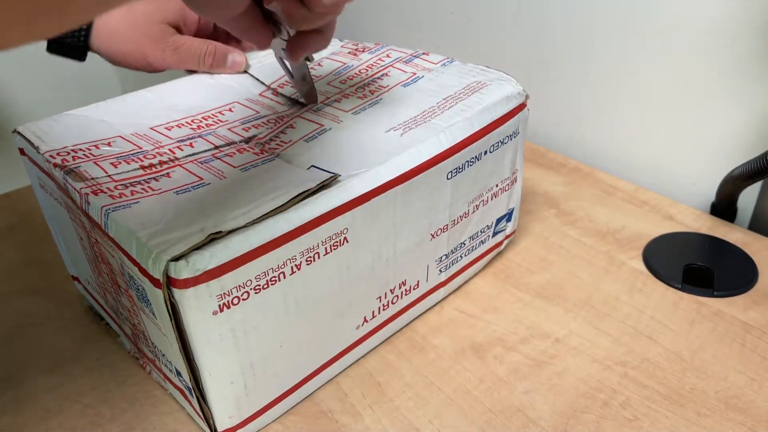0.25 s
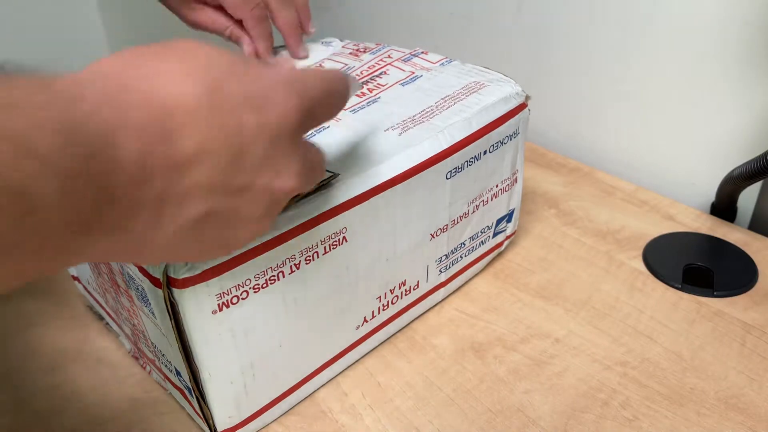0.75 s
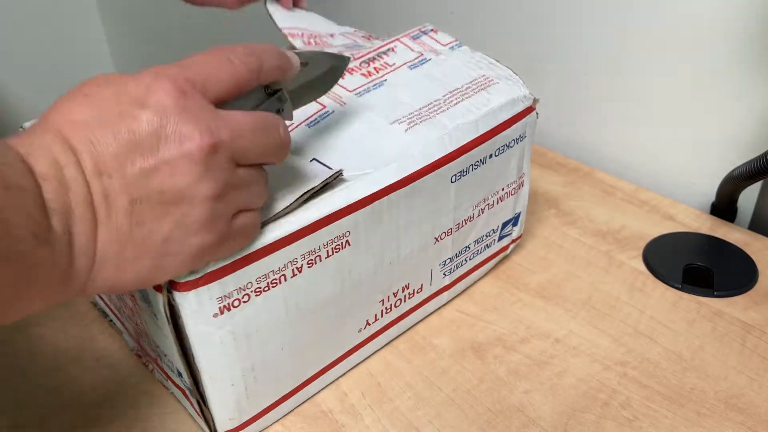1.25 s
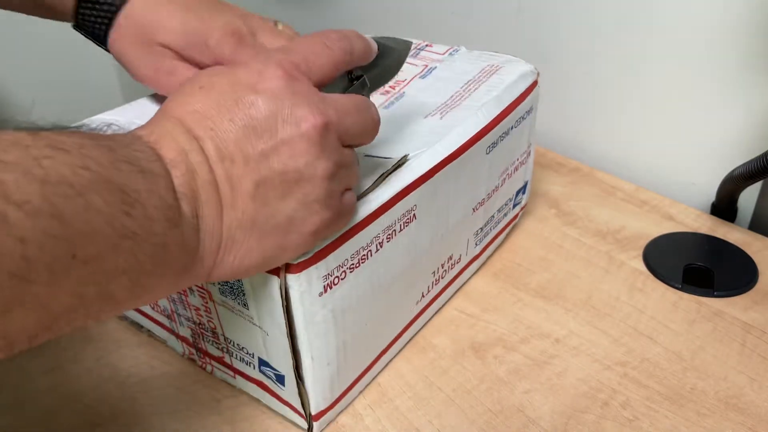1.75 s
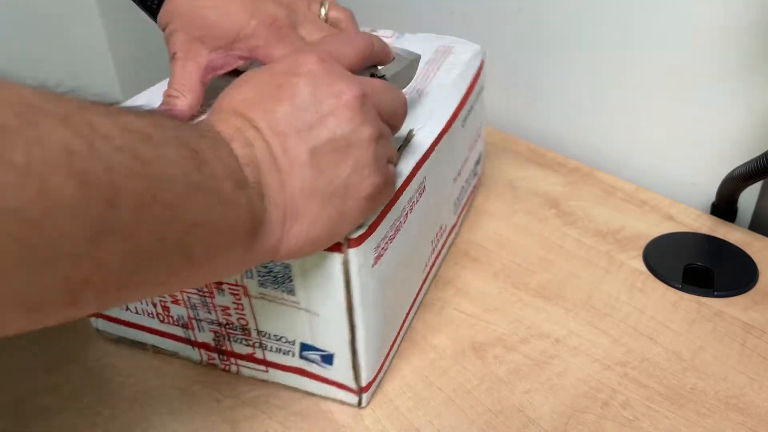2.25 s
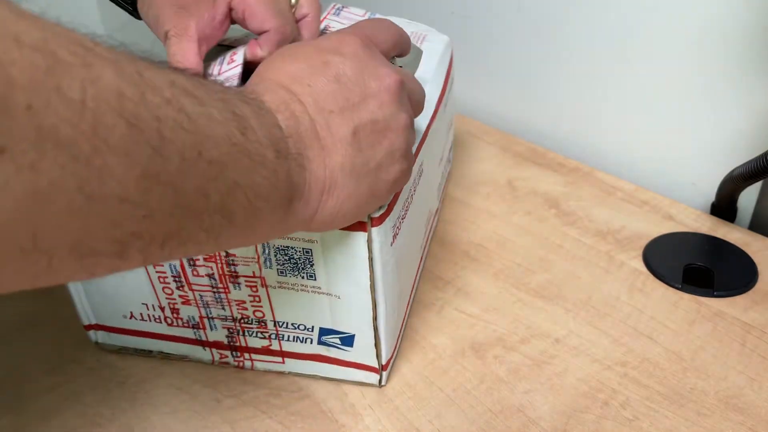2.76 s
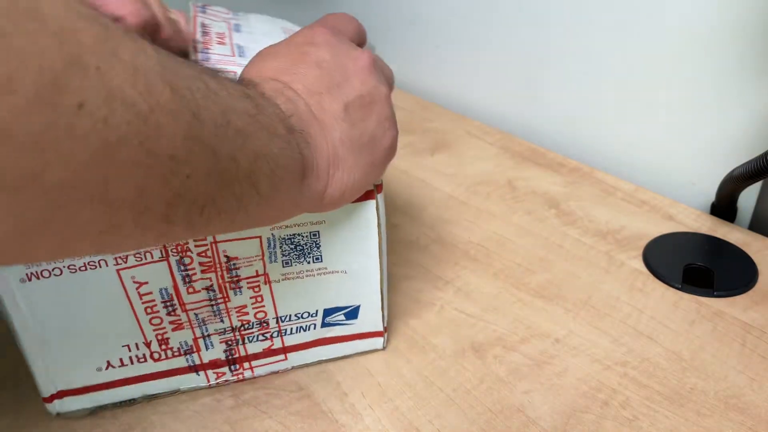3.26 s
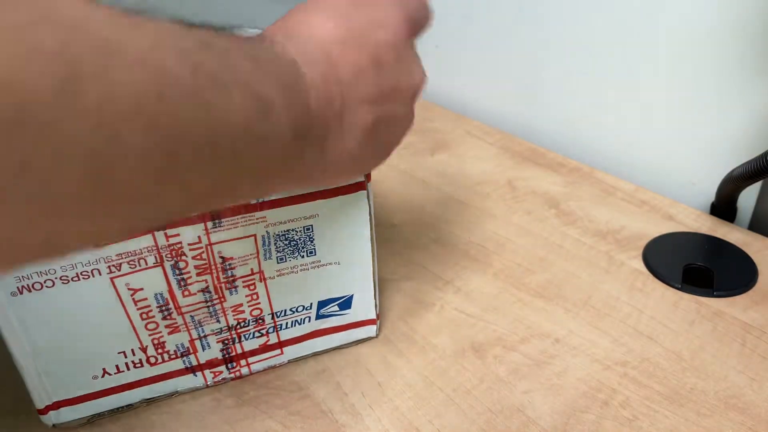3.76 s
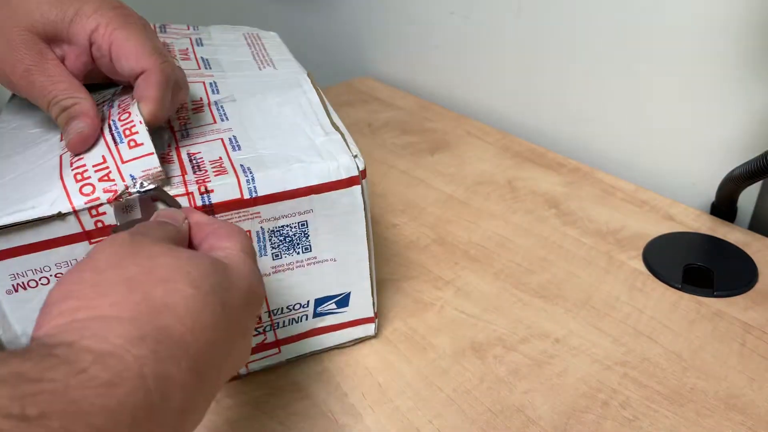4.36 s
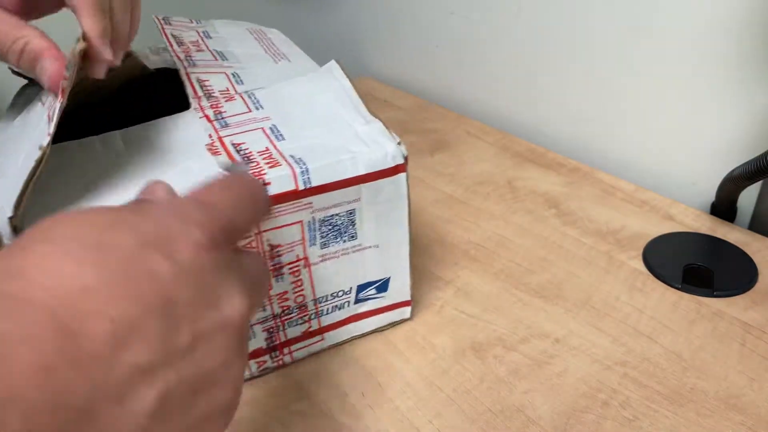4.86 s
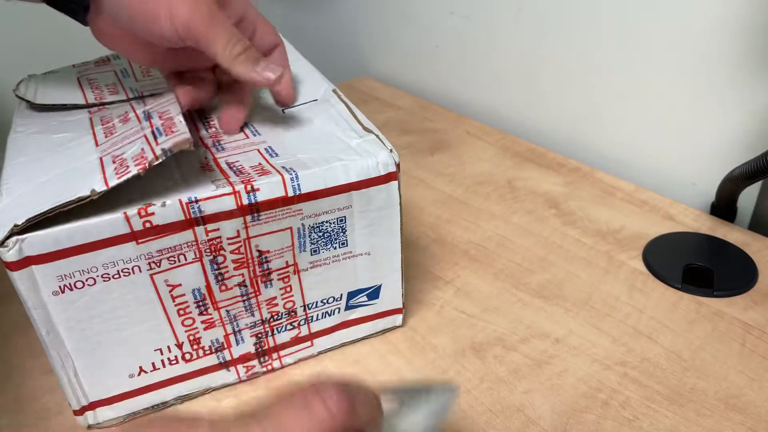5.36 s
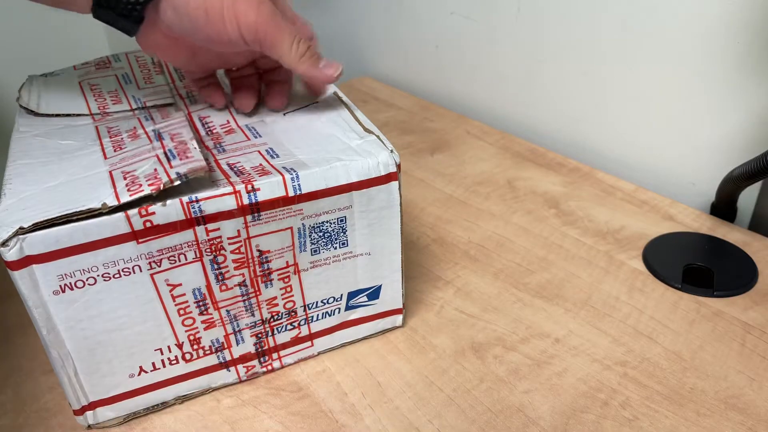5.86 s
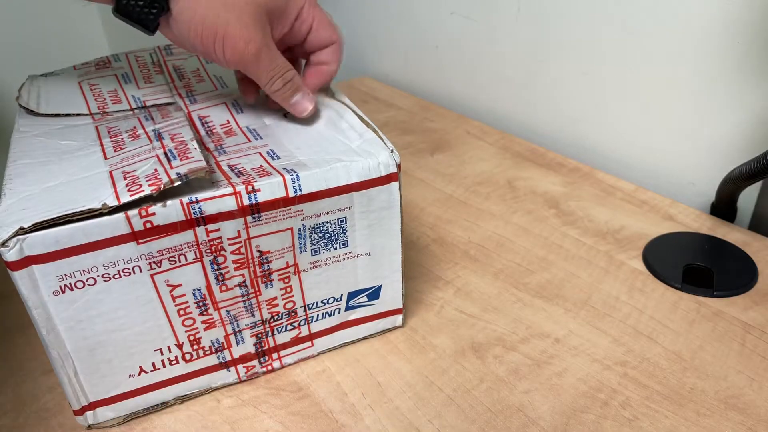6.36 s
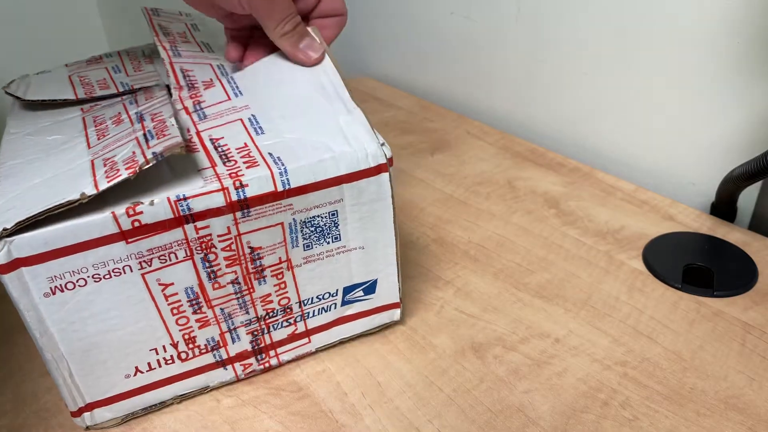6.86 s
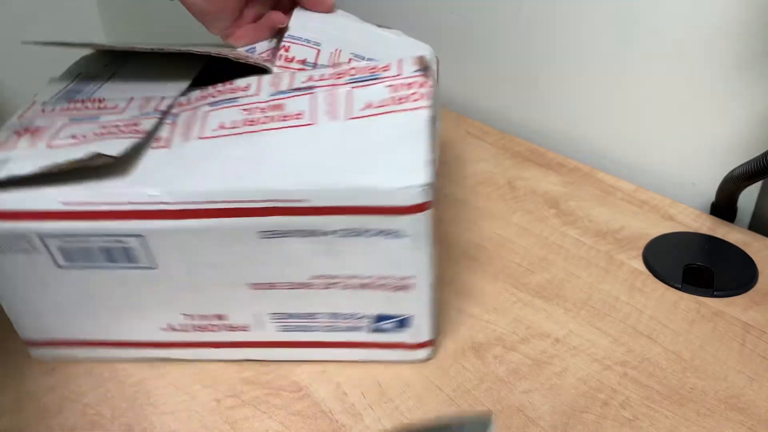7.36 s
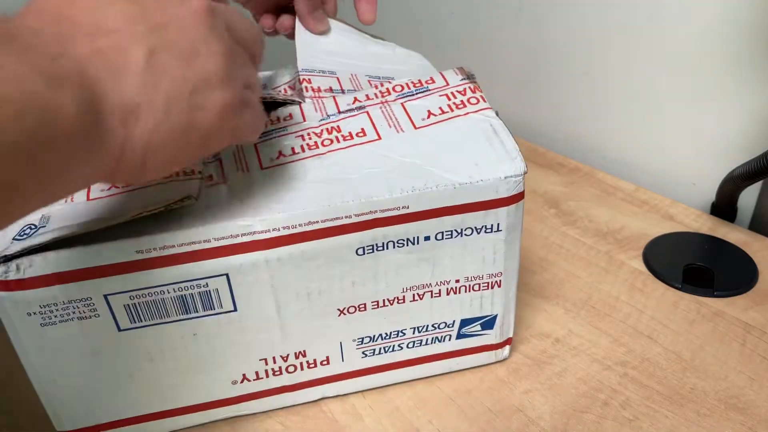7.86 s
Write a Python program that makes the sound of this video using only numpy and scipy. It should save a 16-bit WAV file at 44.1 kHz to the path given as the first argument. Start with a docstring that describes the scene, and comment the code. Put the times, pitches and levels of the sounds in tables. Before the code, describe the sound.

Cardboard box being pulled open by hand on a desk: sharp tape snaps, hollow flap knocks, papery rubbing, over a low steady office hum.

```python
"""A small, humming office: a taped cardboard box is pulled open by hand on a desk.
Tape and paper liner snap and crackle as shaped noise bursts; flaps knock as falling chirps.
Hands and cardboard rub as filtered friction noise, with scrapes, creaks and crumples on top.
Near the end the box is slid round on the desk. Box, room and two microphone ports colour it all."""
import sys
import numpy as np
from scipy import signal
from scipy.fft import rfft, irfft
from scipy.io import wavfile

SR = 44100
rng = np.random.default_rng(int(sys.argv[2]) if len(sys.argv) > 2 else 0)


def master(y):
    """Save y as 16-bit WAV."""
    cut = np.clip(np.atleast_2d(y).T, -1, 1)
    pcm = np.round(cut * 32767)  # scale
    wavfile.write(sys.argv[1], SR, pcm.astype(np.int16))


N = 358091  # length in samples
SIZE = 8192  # length in samples of a short sound or filter
T = np.arange(SIZE) / SR  # s
HZ = np.fft.rfftfreq(SIZE, 1 / SR) + 1  # raised by 1 Hz to keep logarithms finite
STROKE_ATTACK_S, STROKE_RELEASE_S = 0.03, 0.028  # takes hold quickly, dies away as the hand stops


def gain_of(db):
    """Decibels to gain."""
    return 10 ** (np.asarray(db) / 20)


def evened(x):
    """Scales to rms 1."""
    return x / np.sqrt(np.mean(abs(x) ** 2) + 1e-20)


def read(points, hz):
    """Reads a table on a log-frequency axis."""
    f, value = np.transpose(points)
    return np.interp(np.log(hz + 1), np.log(f + 1), value)


def add(mix, s, sound):
    """Mixes a sound in at time s."""
    part = mix[max(round(s * SR), 0):][:len(sound)]
    part += sound[:len(part)]


def colour(x, db):
    """Causal, minimum-phase filter of unit energy with the relative gain db on the grid HZ."""
    cepstrum = irfft(np.log(evened(gain_of(db)) + 1e-5))
    # folding the cepstrum forward in time puts the energy as early as possible
    cepstrum[1:SIZE // 2] *= 2
    cepstrum[SIZE // 2 + 1:] = 0
    impulse = irfft(np.exp(rfft(cepstrum)))
    return signal.fftconvolve(x, impulse)[:len(x)]


def hump(hz, octaves):
    """A bell around hz on a log-frequency axis, top 1."""
    distance = np.log2(HZ / hz) / max(octaves, .05)
    return np.exp(-.5 * distance ** 2)


def wander(per_s):
    """Random drift of rms 1: straight lines between per_s random points a second."""
    t = np.arange(N) / SR
    return evened(np.interp(t * per_s, np.arange(4096), rng.standard_normal(4096)))


def resonate(x, hz, width):
    """A resonance of gain 1 that follows the curve hz: shift down, smooth, shift back."""
    turn = np.exp(2j * np.pi * np.cumsum(hz) / SR)
    r = np.exp(-np.pi * width / SR)
    return 2 * (turn * signal.lfilter([1 - r], [1, -r], x / turn)).real


def stroke(start, length, swell_db=0):
    """Envelope of one stroke: it takes hold, swells or eases while it lasts, and dies away."""
    t = np.maximum(np.arange(N) / SR - start + STROKE_ATTACK_S / 2, 0)
    live = (t > 0) & (t < length + 8 * STROKE_RELEASE_S)
    t, out = t[live], np.zeros(N)
    attack = np.minimum(t / STROKE_ATTACK_S, 1)
    hold = gain_of(swell_db * (np.minimum(t / length, 1) - .5))
    release = np.exp(-np.maximum(t - length, 0) / STROKE_RELEASE_S)
    out[live] = attack * hold * release
    return out


def burst(decay_s, rise_s, after_db, after_s, uneven_db=1.5):
    """Fibres break in a quick, uneven flurry; a few stragglers follow."""
    main = np.exp(-T / max(decay_s, .0003))
    stragglers = gain_of(after_db) * np.exp(-T / after_s)
    shape = (1 - np.exp(-T / rise_s)) * (main + stragglers)
    clumps = np.repeat(rng.standard_normal(SIZE // 16), 16)
    flurry = rng.standard_normal(SIZE) * gain_of(uneven_db * clumps) * shape
    return flurry * np.linalg.norm(shape) / np.linalg.norm(flurry)


def patches(count=28):
    """Each spot of the board favours its own frequencies: a random ripple of rms 1 on the grid HZ."""
    spots = np.linspace(np.log(500), np.log(12000), count)
    return evened(np.interp(np.log(HZ), spots, rng.standard_normal(count), 0, 0))


# tape and liner giving way, levels before the trims in snaps():
# t/s, crack level/dB, panel level/dB, panel f/Hz, brightness/dB per octave
SNAPS = [(0.0277, -21, -30, 735, 0), (0.2404, -23.5, -54, 452, 5.5), (0.3255, -28, -31.5, 557, 2),
         (0.3485, -21.5, -41, 484, 0), (0.612, -36, -30, 750, -2), (0.7866, -28, -34.5, 530, 5),
         (0.9566, -24.5, -30, 448, 4), (1.0834, -17, -28.5, 520, 19), (1.1045, -11.5, -18, 486, 0.5),
         (1.288, -6, -13.5, 1860, -3), (1.2948, -12, -16.5, 1150, -1), (1.3249, -19, -25.5, 1070, 2),
         (1.7214, -23, -32, 880, 4), (1.7593, -21.5, -43, 805, -3.5), (2.1049, -30, -34, 471, -6),
         (2.2409, -18, -29.5, 430, 3), (2.32, -26.5, -43, 1160, -5.5), (2.5341, -23, -30, 1100, -5.5),
         (2.6306, -15, -27.5, 450, -0.5), (3.259, -11, -15, 1890, 0.5), (3.2635, -8, -15, 800, 4.5),
         (3.4705, -36, -32.5, 600, -6), (4.004, -37.5, -28.5, 494, -0.5), (4.1021, -28, -31, 513, 3),
         (4.4407, -4.5, -13.5, 444, -0.5), (4.496, -11, -24.5, 1100, -5.5), (5.0421, -25, -48, 624, 3),
         (5.1701, -36.5, -33, 810, -3.5), (5.2964, -31, -35, 840, -1), (5.3127, -27, -32, 540, -8),
         (5.3965, -31, -37, 760, -9), (5.4682, -25.5, -40, 1110, -3), (5.5268, -41, -38.5, 1110, -10),
         (6.039, -25.5, -43, 2400, -3.5), (6.2789, -26, -31, 945, 0), (6.3588, -25, -42, 501, 2.5),
         (6.6025, -15.5, -32.5, 960, -1), (6.661, -22.5, -47, 536, 5.5), (6.6791, -25, -40, 600, 1),
         (6.8668, -24.5, -38, 645, 1), (6.9155, -20, -38.5, 620, 6), (7.5832, -26, -27, 430, -14),
         (7.6319, -21.5, -34, 748, -6), (7.8042, -24, -39, 455, 0), (7.8317, -52.5, -30.5, 1240, 8),
         (7.9816, -24.5, -64, 1720, -4), (8.065, -17.5, -36.5, 1400, -1.5), (8.094, -23.5, -36, 1380, -4.5),
         (8.111, -25, -36, 1300, -3)]
# colour of a crack in the air: f/Hz, relative level/dB per Hz
CRACK_COLOUR = [(300, -16), (1200, -6.5), (2500, 0.5), (4000, -2.5), (6000, -3.5), (8500, 1.5), (11500, 5),
                (12800, -9.5), (14000, -24), (16000, -24)]
# colour of the paper liner when it flexes at a snap: f/Hz, relative level/dB per Hz
LINER_COLOUR = [(80, -19), (220, -3), (500, -2.5), (1150, -7), (1900, -14), (3000, -22.5), (6000, -53.5)]


def snaps(crack_db=-6, panel_db=3.0, ring_db=6, ring_octaves=0.091, lead_in_db=-20, lead_in_s=0.0033,
          patchy_db=2):
    """Each snap cracks in the air and rings the panel it sits on."""
    out = np.zeros(N)
    for s, db, body_db, hz, bright_db in SNAPS:
        tilt = bright_db * np.log2(np.maximum(HZ, 400) / 5000)
        tone = read(CRACK_COLOUR, HZ) + tilt + patchy_db * patches()
        flurry = burst(decay_s=0.0028, rise_s=0.00031, after_db=-26.5, after_s=0.012)
        flexing = burst(decay_s=0.0025, rise_s=0.0011, after_db=-14.5, after_s=0.017)
        panel = colour(flexing, read(LINER_COLOUR, HZ) + ring_db * hump(hz, ring_octaves))
        panel *= np.linalg.norm(flurry) / np.linalg.norm(panel)
        crack = gain_of(db + crack_db) * colour(flurry, tone)
        add(out, s, crack + gain_of(body_db + panel_db) * panel)
        # a brief noise swell, a decay played backwards, softens the attack
        lead_in = colour(rng.standard_normal(SIZE) * np.exp(-T / lead_in_s), tone)
        lead_in = lead_in[:round(min(s, .03) * SR)][::-1]
        add(out, s - len(lead_in) / SR, gain_of(db + crack_db + lead_in_db) * lead_in)
    return out


# thin, dry ticks of taut tape: t/s, level/dB before trim and colour, f/Hz, decay/s
TICKS = [(0.247, -22, 8300, .0015), (.337, -31, 6100, 0.0013), (1.0811, -10.5, 8250, 0.0012),
         (1.115, -17.5, 8000, .002), (3.367, -20, 4530, 0.0025), (4.768, -27.5, 2720, 0.0023),
         (5.311, -24, 6500, .0012), (5.342, -10, 9000, 0.0012), (5.3532, -10.5, 6700, 0.00052),
         (5.354, -23, 2510, 0.0017), (5.67, -32.5, 3270, 0.0015), (6.533, -22.5, 8300, 0.0033),
         (6.55, -16, 8260, 0.0036), (6.606, -19, 5500, .001), (6.788, -23, 8360, .0015),
         (6.817, -21, 8200, .0012), (6.875, -24, 2440, .0015), (6.916, -15, 6800, 0.0018)]


def ticks(level_db=-7, ring_db=13, ring_octaves=0.25):
    """Taut tape flicks with a short, high ring: a noise burst peaked around one pitch."""
    out = np.zeros(N)
    for s, db, hz, decay_s in TICKS:
        flurry = burst(decay_s, rise_s=0.00032, after_db=-43, after_s=.006)
        tone = read(CRACK_COLOUR, HZ) + ring_db * hump(hz, ring_octaves)
        add(out, s, gain_of(db + level_db) * colour(flurry, tone))
    return out


# a stiff flap edge is flicked and rings briefly: t/s, peak level/dB, f/Hz, decay/s
TAPS = [(1.089, -28, 1190, 0.0027), (2.231, -34, 1160, .002), (2.243, -28, 1140, .002),
        (2.3221, -25.5, 1140, 0.0027), (2.535, -25.5, 1180, 0.004), (2.537, -30, 780, 0.0021),
        (4.005, -35, 1000, 0.0019), (5.1705, -43, 820, 0.0033), (5.398, -30, 720, 0.003),
        (5.666, -40.5, 900, 0.0023), (5.868, -38, 950, .002), (5.905, -37, 600, .002),
        (6.28, -36, 3170, 0.0029), (6.283, -35, 874, .003), (6.578, -33, 900, .0015),
        (6.59, -28, 800, 0.0013), (6.605, -29, 1060, 0.0017), (6.678, -35, 1440, 0.004),
        (7.078, -35, 700, .0015), (7.584, -45, 810, 0.0026)]


def taps(level_db=0, rise_s=0.00058, sag=0.011):
    """A flicked edge swings a few cycles, a little sharp at first."""
    out = np.zeros(N)
    for s, db, hz, decay_s in TAPS:
        fade = np.exp(-T / decay_s)
        phase = 2 * np.pi * np.cumsum(hz * (1 + sag * fade)) / SR
        ring = (1 - np.exp(-T / rise_s)) * fade * np.sin(phase)
        add(out, s, gain_of(db + level_db) * ring / abs(ring).max())
    return out


# flaps and hands bumping the box: t/s, peak level/dB before trim, f/Hz, spread/octaves
KNOCKS = [(0.031, -27, 150, 1.1), (0.237, -31.5, 150, 1.54), (0.349, -25, 354, 0.59),
          (0.616, -22, 121, 1.08), (0.789, -30, 163, 0.85), (0.831, -26, 527, 0.67),
          (1.104, -27, 332, 0.27), (1.137, -32.5, 130, 0.93), (1.289, -8.5, 366, 0.43),
          (1.298, -9.5, 207, 0.83), (1.324, -26.5, 100, 1.2), (2.121, -28.5, 520, 0.94),
          (2.243, -26, 262, 0.61), (2.63, -23, 171, 0.83), (2.643, -23, 450, 0.77),
          (3.264, -9.5, 794, 1.47), (3.696, -29.5, 423, 1), (4.004, -16, 260, 0.59),
          (4.115, -31.5, 190, 1.3), (4.292, -21, 125, 1), (4.441, -8, 249, 0.91), (4.499, -23, 140, 1.7),
          (5.171, -25, 387, 0.87), (5.396, -31, 110, 0.62), (5.476, -31.5, 88.4, 1.25),
          (6.285, -25.5, 294, 0.67), (6.62, -25, 134.4, 0.28), (6.626, -25.5, 382, 0.4),
          (7.581, -27, 260, 1.3), (7.637, -35, 850, .5), (8.066, -30.5, 194, 0.31)]


def knocks(lag_cycles=1.491, level_db=-2):
    """Bending waves cross the board, high notes first, so each knock is a quick falling chirp."""
    out = np.zeros(N)
    lag = np.exp(-2j * np.pi * lag_cycles * np.log(HZ / 300))
    low_cut = HZ ** 2 / (HZ ** 2 + 55 ** 2)
    for s, db, hz, octaves in KNOCKS:
        spectrum = hump(hz, octaves) / np.sqrt(HZ) * low_cut
        wave = irfft(spectrum * lag)[:SIZE // 2]
        add(out, s, gain_of(db + level_db) * wave / abs(wave).max())
    return out


def friction(rough, per_s, spread_db, grain_db, judder_db):
    """Countless tiny slips blend to a hiss; larger catches stand out, and the contact judders."""
    sizes = gain_of(spread_db * np.minimum(rng.exponential(1, N), 5))
    catches = sizes * rng.choice([-1, 1], N) * (rng.random(N) < per_s / SR)
    slips = rng.standard_normal(N) + rough * gain_of(grain_db) * evened(catches)
    return evened(slips * gain_of(rough * judder_db * wander(150)))


# strokes of hand, flap or box over a surface; tape and torn edges are rough, the desk is smooth.
# levels before the trims in rubbing():
# t/s, length/s, surface hiss level/dB, panel rumble level/dB, swell start to end/dB, roughness
STROKES = [(-0.003, 0.12, -49, -40.5, -14, 0.48), (0.147, 0.061, -57, -51.5, -5, 0.77),
           (0.215, 0.13, -47.5, -48, -7, 0.6), (0.304, 0.063, -44, -43, 0.5, 1.2),
           (0.596, 0.023, -45.5, -38, 2, 0.56), (0.704, 0.12, -49, -48.5, 9.5, 0.8),
           (0.973, 0.12, -55.5, -60, 23, 1.1), (1.09, 0.057, -38, -44, 1, 0.16),
           (1.134, 0.23, -42, -42, 4, 0.52), (1.392, 0.19, -46, -53, -8, 0.16),
           (1.729, 0.085, -48.5, -41, -11.5, 0.8), (1.856, 0.26, -57.5, -52, -2, 0.9),
           (2.069, 0.19, -42, -45, 7.5, 0.58), (2.27, 0.29, -55, -54, -16, 0.53),
           (2.528, 0.22, -49, -43, -4.5, 0.43), (2.763, 0.14, -43.5, -43, 10, 0.08),
           (2.92, 0.11, -46.5, -48.5, -4, 0.3), (3.023, 0.3, -41, -37.5, 1.5, 0.13),
           (3.35, 0.14, -51.5, -56, -12, 0.7), (3.484, .25, -40, -39.5, -5.5, 0.44),
           (3.772, 0.097, -54.5, -58, -6, 0.57), (4.012, 0.17, -53.5, -66, 8, 0.4),
           (4.209, 0.09, -43, -44.5, 7, 0.46), (4.415, 0.099, -39.5, -36, 11.5, 0.23),
           (4.554, 0.071, -33, -38.5, 6.5, 0.43), (4.65, 0.35, -51.5, -46.5, 6, 0.3),
           (4.966, 0.14, -42.5, -46, 1, 0.48), (5.172, 0.09, -47.5, -45.5, -3, 0.13),
           (5.268, 0.14, -49, -46, -2, 0.55), (5.457, 0.037, -46, -42.5, -1, 0.9),
           (5.541, 0.16, -53.5, -48.5, -4, 0.53), (5.772, 0.14, -49.5, -50.5, 5, 0.37),
           (5.932, 0.17, -51, -47.5, 4.5, 0.84), (6.153, 0.082, -42, -44.5, -2.5, 0.42),
           (6.24, 0.15, -47.5, -45.5, -4, 0.4), (6.445, 0.027, -43, -45, -2, 0.7),
           (6.532, 0.11, -40, -40.5, 6.5, 0.47), (6.659, 0.053, -34.5, -43, -1, 0.43),
           (6.764, 0.061, -38.5, -53, 8, 0.57), (6.846, 0.1, -41, -53, -1, 1.16),
           (6.959, 0.15, -45, -47, 6.5, 0.3), (7.109, 0.32, -37.5, -56, -2.5, 0),
           (7.427, 0.18, -40, -43, -0.5, 0.35), (7.59, 0.24, -49, -48.5, -2, 0.46),
           (7.783, 0.11, -51, -47.5, -12, 1.2), (7.968, 0.092, -50.5, -56, 10, 0.16),
           (8.047, 0.089, -44, -48, 12, 0.2)]
HOLD_HISS_DB, HOLD_RUMBLE_DB = -66.5, -57.5  # hands never rest quite still; before the same trims


def contact():
    """Sums the power of all strokes: gain of surface hiss, gain of panel rumble, roughness 0-1."""
    hiss = np.full(N, gain_of(HOLD_HISS_DB) ** 2)
    rumble = np.full(N, gain_of(HOLD_RUMBLE_DB) ** 2)
    rough = np.zeros(N)
    for start, length, hiss_db, rumble_db, swell_db, roughness in STROKES:
        power = stroke(start, length, swell_db) ** 2
        hiss += power * gain_of(hiss_db) ** 2
        rumble += power * gain_of(rumble_db) ** 2
        rough += power * (gain_of(hiss_db) ** 2 * roughness)
    return np.sqrt(hiss), np.sqrt(rumble), np.clip(rough / hiss, 0, 1)


def crinkles(drive, per_s=45, spread_db=1.0, level_db=-10, low_hz=800, high_hz=4500, decay_s=0.0022,
             ring_db=12, ring_octaves=0.043, count=8):
    """Small creases pop at random under a rough stroke, with short rings at one of count pitches."""
    out = np.zeros(N)
    for hz in np.geomspace(low_hz, high_hz, count):
        sizes = gain_of(spread_db * np.minimum(rng.exponential(1, N), 3))
        pops = sizes * (rng.random(N) < per_s / count / SR)
        tone = read(CRACK_COLOUR, HZ) + ring_db * hump(hz, ring_octaves)
        pop = colour(rng.standard_normal(SIZE) * np.exp(-T / decay_s), tone)
        out += signal.oaconvolve(pops, evened(pop))[:N]
    return gain_of(level_db) * drive * evened(out)


# colour of the rubbed surface: f/Hz, relative level/dB per Hz
HISS_COLOUR = [(300, 5.5), (1200, -5.5), (2200, -1), (4000, -2), (6500, -2.5), (8500, 4.5), (10000, 3.5),
               (11400, 7.5), (12600, -5.5), (13800, -28), (16000, -22)]
# colour of the rumbling panels: f/Hz, relative level/dB per Hz
PANEL_COLOUR = [(80, -11.5), (200, 7), (400, 5.5), (800, 4), (1200, -3), (1700, -5.5), (2600, -9),
                (5000, -23), (12000, -97)]


def rubbing(hiss_db=-4.0, rumble_db=-4.5, pressure_db=-2.0):
    """Skin, flaps and desk rub under uneven pressure: the surface hisses and crinkles, panels rumble."""
    hiss, rumble, rough = contact()
    slips = friction(rough, per_s=330, spread_db=4.5, grain_db=-0.5, judder_db=4.0)
    drags = friction(rough, per_s=200, spread_db=4.0, grain_db=-3.0, judder_db=4.0)
    surface = gain_of(hiss_db) * hiss * colour(slips, read(HISS_COLOUR, HZ))
    panels = gain_of(rumble_db) * rumble * colour(drags, read(PANEL_COLOUR, HZ))
    pressure = gain_of(pressure_db * rough * wander(25))
    return (surface + panels) * pressure + crinkles(rough * np.hypot(hiss, rumble))


# colour of rubbing while the fingers hold the loose flap: f/Hz, level/dB
FLAP_COLOUR = [(300, 1.5), (900, -1), (1550, 3), (2000, -7.5), (2600, 0.5), (3050, 3), (3800, -0.5),
               (4600, 0), (6000, 1), (9000, -1)]
FLAP_HELD_S, FLAP_HELD_FOR_S = 5.45, 1.3


def flap(x):
    """Rubbing is heard through the loose flap for as long as it is held."""
    held = stroke(FLAP_HELD_S, FLAP_HELD_FOR_S)
    tone = read(FLAP_COLOUR, HZ)
    level = np.sqrt(np.mean(gain_of(tone) ** 2))  # undoes the unit-energy scaling of colour()
    return x * (1 - held) + colour(x * held, tone) * level


# an edge scrapes along and its hollow colour drifts; the last three are the box turning on the desk:
# t/s, length/s, level/dB, first f/Hz, last f/Hz (both before a slight waver)
SCRAPES = [(5.55, 0.16, -59, 1470, 1470), (7.073, 0.15, -57, 1490, 2060), (7.25, 0.18, -60, 3880, 5000),
           (7.44, 0.11, -60, 2720, 3100)]


def scrapes(width_share=0.23, waver=0.019):
    """Fine slips pass through a broad resonance that glides as the point of contact moves."""
    slips = friction(0.53, per_s=240, spread_db=1.0, grain_db=-2, judder_db=6.5)
    sway, out = np.exp(waver * wander(26)), np.zeros(N)
    for start, length, db, first_hz, last_hz in SCRAPES:
        shape = stroke(start, length)
        live = shape > 0
        t = np.flatnonzero(live) / SR
        pitch = np.interp(t, [start, start + length], [first_hz, last_hz]) * sway[live]
        width = width_share * first_hz
        rung = resonate(resonate(slips[live], pitch, width), pitch, width)
        out[live] += gain_of(db) * shape[live] * evened(rung)
    return out


# a bent flap creaks around one pitch: t/s, length/s, level/dB, f/Hz, width/Hz, mean slips per s
CREAKS = [(2.186, 0.044, -39.5, 1190, 420, 75)]


def creaks(waver=0.023, uneven=0.28, size_db=3, hiss_db=-11):
    """A flap sticks and slips in jerks into its own resonance, which wavers as the fingers shift."""
    pace, size = np.exp(uneven * wander(90)), gain_of(size_db * wander(120))
    sway, out = np.exp(waver * wander(30)), np.zeros(N)
    for start, length, db, hz, width_hz, per_s in CREAKS:
        shape = stroke(start, length)
        live = shape > 0
        steps = np.floor(np.cumsum(per_s * pace[live]) / SR)
        jerks = np.diff(steps, prepend=0) * size[live]
        slips = evened(jerks) + gain_of(hiss_db) * rng.standard_normal(len(jerks))
        pitch = hz * sway[live]
        rung = resonate(resonate(slips, pitch, width_hz), pitch, width_hz)
        out[live] += gain_of(db) * shape[live] * evened(rung)
    return out


# corrugation crumples along a fold or tear:
# t/s, length/s, level/dB, swell start to end/dB, middle f/Hz
CRUMPLES = [(0.32, 0.098, -52, -8, 750), (1.301, 0.087, -45, -18, 1000), (3.05, 0.21, -51, 2, 800),
            (3.275, 0.073, -38.5, -13, 1540), (3.47, .23, -50, -7, 800), (4.455, .03, -38.5, -3, 750),
            (4.86, 0.13, -54, 0, 750), (5.376, 0.013, -49, 0, 1640), (5.816, .08, -55, -7, 1450),
            (6.564, 0.055, -44.5, -2, 1000), (6.872, .055, -46.5, 0, 2400), (7.575, .015, -41, 3, 900),
            (7.79, .07, -52, -4, 1400), (8.03, 0.096, -48.5, 8, 2200)]


def crumples(per_s=330, size_db=1.5, octaves=0.64):
    """Flutes buckle one after another: a dense run of tiny pops, each a cycle or two at its own pitch."""
    out, t = np.zeros(N), T[:SIZE // 16]
    for start, length, db, swell_db, middle_hz in CRUMPLES:
        shape = stroke(start, length, swell_db)
        live = shape > 0
        run = np.zeros(live.sum())
        for k, (late, size, pitch) in enumerate(rng.uniform(-1, 1, (SIZE // 32, 3))):
            turns = t * middle_hz * 2 ** (2 * octaves * pitch)
            pop = np.sin(2 * np.pi * turns) * np.exp(-turns)
            # pops far from the middle pitch are softer
            gain = gain_of(2 * size_db * size) * np.cos(pitch)
            add(run, (k + late) / per_s, gain * evened(pop))
        out[live] += gain_of(db) * shape[live] * evened(run)
    return out


# ringing modes of the hollow box: f/Hz, level/dB, t60/s
BOX_MODES = [(86.5, 11.5, 0.061), (139, 2.5, 0.35), (377, -18.5, 0.053), (422, -15.5, 0.03),
             (587, -17, 0.099), (1193, -15, 0.14), (1790, -22, 0.053)]
DIP_HZ, DIP_Q, DIP_DEPTH = 248.6, 4.7, 0.57  # the box radiates weakly just above its lowest rings


def box(x, ring_db=0):
    """Everything that touches the box sets its walls and cavity ringing in decaying modes."""
    ring = np.zeros(SIZE)
    for hz, db, t60 in BOX_MODES:
        fade = np.exp(-np.log(1000) * T / t60)
        ring += gain_of(db + ring_db) * 2 * fade / fade.sum() * np.cos(2 * np.pi * hz * T)
    rung = x + signal.fftconvolve(x, ring)[:N]
    return rung - DIP_DEPTH * signal.lfilter(*signal.iirpeak(DIP_HZ, DIP_Q, SR), rung)


def spread(x, apart_db=-8.5, across_s=0.00075, count=24):
    """The wide, near box's faces reach each port differently, and ever anew as it is handled."""
    place, apart = np.linspace(0, count - 1, N), np.zeros(N)
    band = signal.butter(2, [230, 7000], "band", fs=SR)
    for k in range(count):
        paths = rng.standard_normal(SIZE // 16) * np.exp(-T[:SIZE // 16] / across_s)
        share = np.cos(np.pi / 2 * np.clip(place - k, -1, 1))  # crossfade to the next paths
        apart += signal.oaconvolve(x * share, paths / np.linalg.norm(paths))[:N]
    apart = gain_of(apart_db) * signal.lfilter(*band, apart)
    return np.array([apart, -apart])


def far_faces(level_db=-15, low_hz=500):
    """Rubbing on the side faces reaches the two ports in opposite phase and widens the sound."""
    high_pass = signal.butter(2, low_hz, "high", fs=SR)
    rub = gain_of(level_db) * signal.lfilter(*high_pass, rubbing())
    return np.array([rub, -rub])


# decay of the office: f/Hz, t60/s
ROOM_DECAY = [(100, 0.37), (260, 0.51), (700, 0.37), (1840, 0.38), (4850, 0.33), (12000, 0.17)]
# how alike the reflected sound is at both ports: f/Hz, likeness 0-1
LIKENESS = [(100, 1), (250, 0.9), (600, 0), (4000, 0), (8000, 0.76), (12000, 1)]


def echoes(wet_db=-12, early_db=-11, early_s=0.006):
    """Desk and wall reflect at once, then the room dies away: noise decaying band by band."""
    hz, t, z = signal.stft(rng.standard_normal((2, SR // 2)), SR, nperseg=256)
    same = np.clip(read(LIKENESS, hz), 0, 1)[:, None]
    z[1] = same * z[0] + np.sqrt(1 - same ** 2) * z[1]
    room_fade = np.exp(-np.log(1000) * t / read(ROOM_DECAY, hz)[:, None])
    early_fade = (hz[:, None] > 300) * np.exp(-t / early_s)
    tail = signal.istft(z * room_fade, SR, nperseg=256)[1]
    early = signal.istft(z * early_fade, SR, nperseg=256)[1]
    echo = gain_of(wet_db) * tail / np.linalg.norm(tail[0])
    echo += gain_of(early_db) * early / np.linalg.norm(early[0])
    return np.pad(echo, ((0, 0), (SR // 500, 0)))  # 2 ms before the first reflection


def office(x, count=9):
    """The pattern of reflections changes as hands and box move about: count patterns crossfade."""
    place, out = np.linspace(0, count - 1, N), x
    for k in range(count):
        share = np.cos(np.pi / 2 * np.clip(place - k, -1, 1))
        out = out + signal.oaconvolve((x * share)[None], echoes(), axes=1)[:, :N]
    return out


# colour of the office air: f/Hz, relative level/dB per Hz
AIR_COLOUR = [(20, -3), (40, -15), (58, 10), (80, 8.5), (115, 17.5), (150, 8.5), (200, 0), (300, -0.5),
              (500, -18.5), (1000, -15.5), (2500, -23.5), (6500, -33), (8500, -24.5), (11200, -22),
              (13500, -63)]


def air(level_db=-46.0, apart_db=-8):
    """Ventilation rumble and faint hiss as coloured noise, partly opposed between the ports."""
    shared, apart = (colour(rng.standard_normal(N), read(AIR_COLOUR, HZ)) for _ in range(2))
    apart = signal.lfilter(*signal.butter(1, [140, 6000], "band", fs=SR), apart)
    return gain_of(level_db) * (shared + gain_of(apart_db) * np.array([apart, -apart]))


# harmonics of the mains hum, from the first up: rms level/dB before the waver
HUM_HARMONICS = [-50, -32.5, -65]
MAINS_HZ = 59.98


def hum(waver_db=1.5):
    """A mains hum of steady pitch and slightly wavering level, alike at both ports."""
    t, tones = np.arange(N) / SR, np.zeros(N)
    for k, db in enumerate(HUM_HARMONICS, 1):
        turns = k * MAINS_HZ * t + rng.random()
        tones += np.sqrt(2) * gain_of(db) * np.sin(2 * np.pi * turns)
    return gain_of(waver_db * wander(8)) * tones


# phase between the two microphone ports: f/Hz, lead of left/radians
PORT_PHASE = [(0, 0), (2000, .1), (2600, .8), (6500, .3), (7800, .8), (8900, -.3), (9800, -2.5),
              (10450, -3.45), (11300, -5.4), (12600, -6.9), (14500, -12.5)]
# balance of the two microphone ports: f/Hz, left minus right level/dB
PORT_BALANCE = [(100, 0), (140, 0), (280, 3.5), (600, 4), (1500, 3), (5000, 4), (7300, 3.5), (8200, .2),
                (16000, 0)]


def ports(x):
    """The two microphone ports hear the box with different level and phase."""
    hz, side = np.fft.rfftfreq(N, 1 / SR), np.array([[.5], [-.5]])
    balance = gain_of(side * read(PORT_BALANCE, hz))
    lead = np.exp(1j * side * read(PORT_PHASE, hz))
    return irfft(rfft(x) * balance * lead, N)


def scene():
    """The box on its desk, in the humming office."""
    tape = snaps() + ticks()
    board = taps() + knocks() + scrapes() + creaks() + crumples()
    handling = box(tape + board + flap(rubbing()))
    return ports(office(handling) + spread(handling) + far_faces() + air()) + hum()


EDGE_HZ = 16000  # upper band limit


def record(dry):
    """The microphone rounds off the hardest pops; then the band limit."""
    rounded = dry / (1 + (dry / .9) ** 4) ** .25
    low_pass = signal.firwin(511, EDGE_HZ, window=("kaiser", 9), fs=SR)
    return signal.oaconvolve(rounded, low_pass[None], "same")


dry = scene()
out = record(dry)
master(out)
```